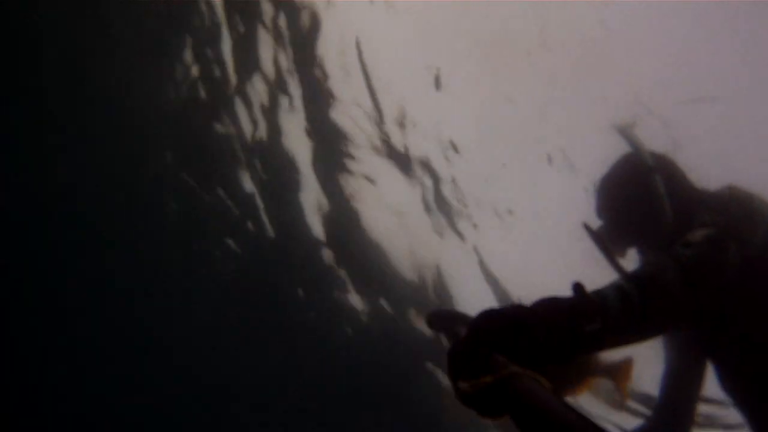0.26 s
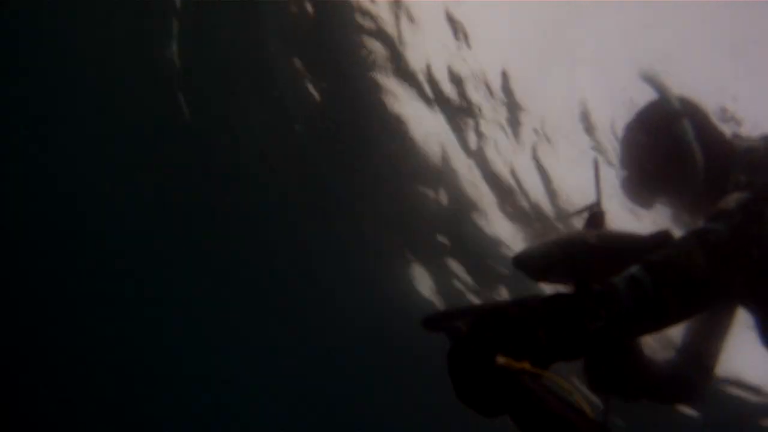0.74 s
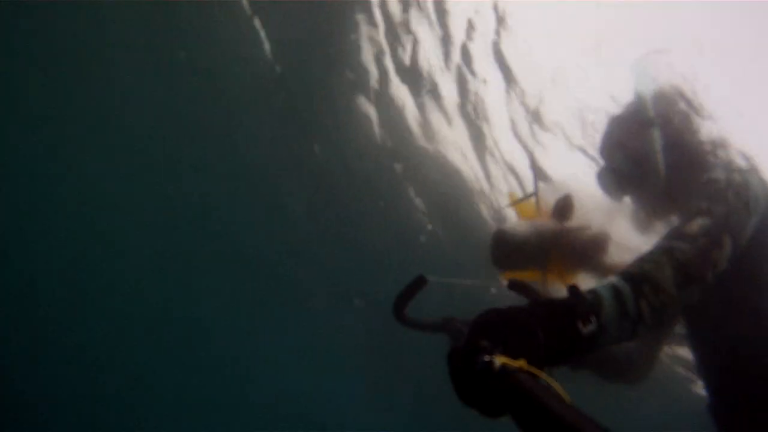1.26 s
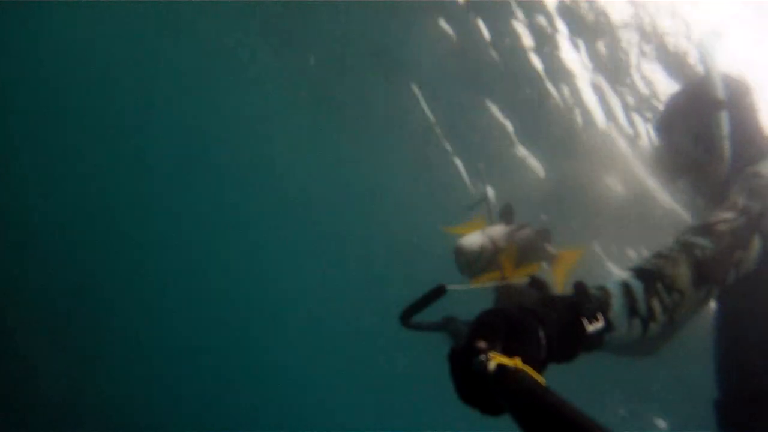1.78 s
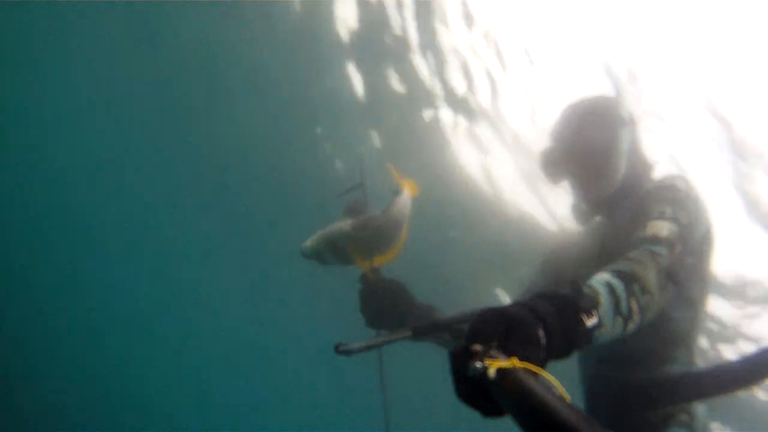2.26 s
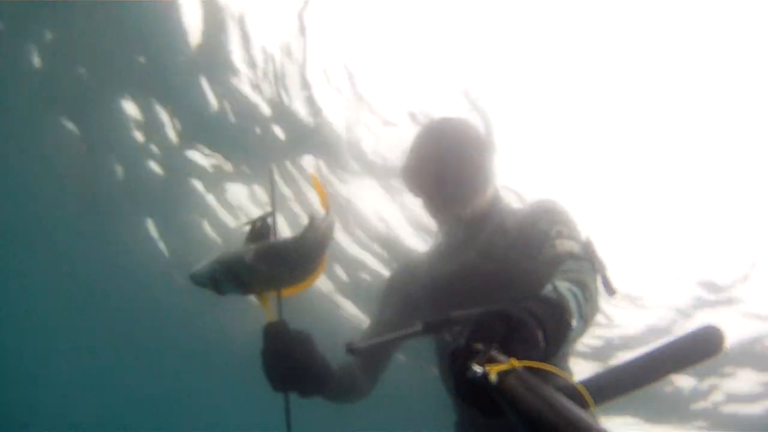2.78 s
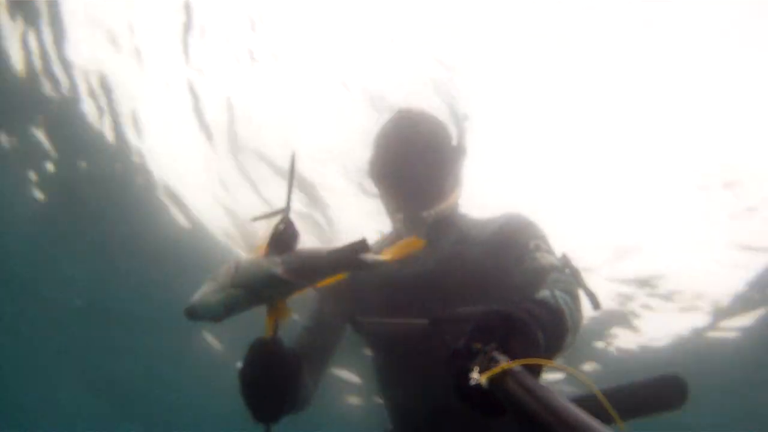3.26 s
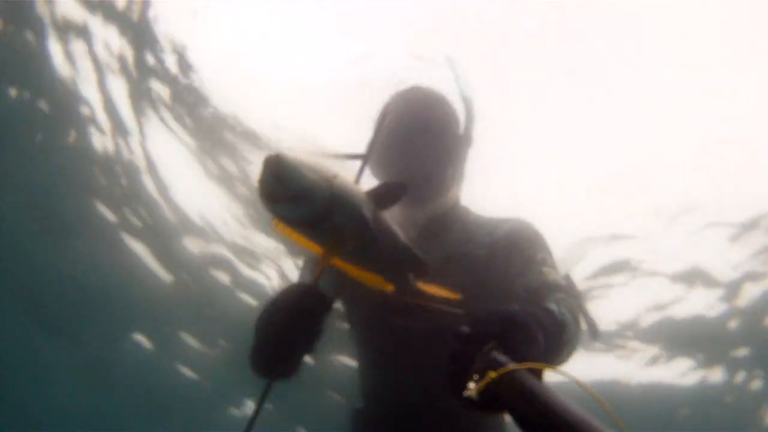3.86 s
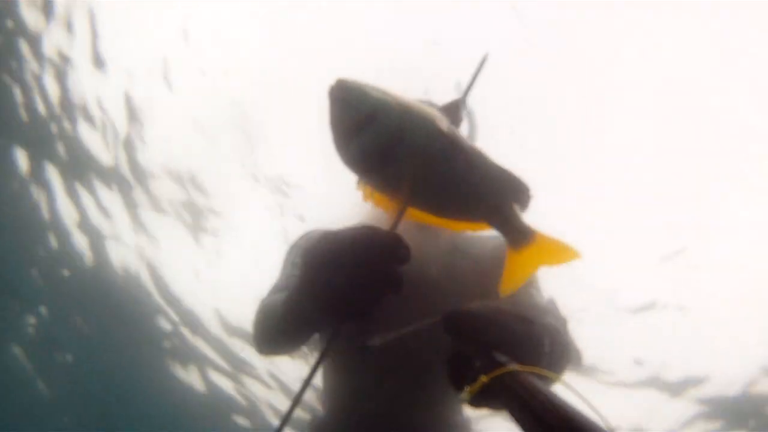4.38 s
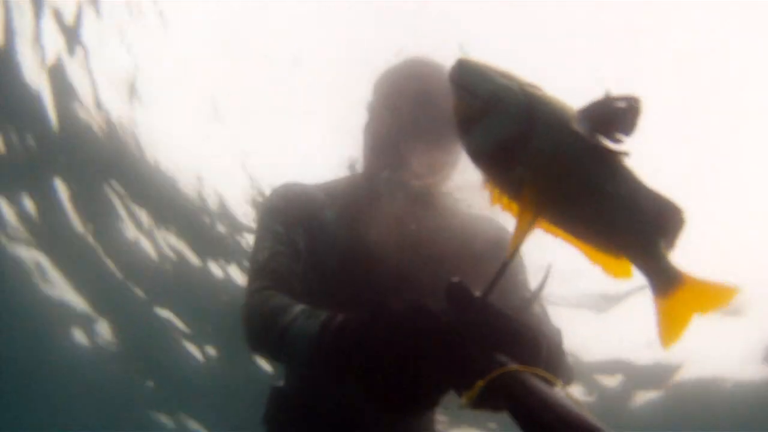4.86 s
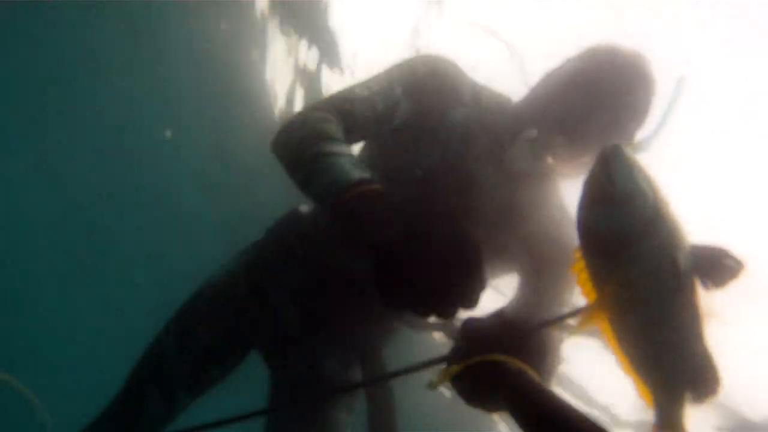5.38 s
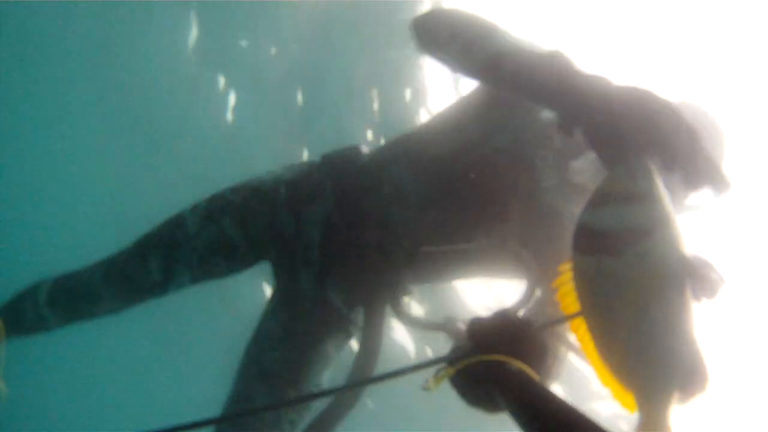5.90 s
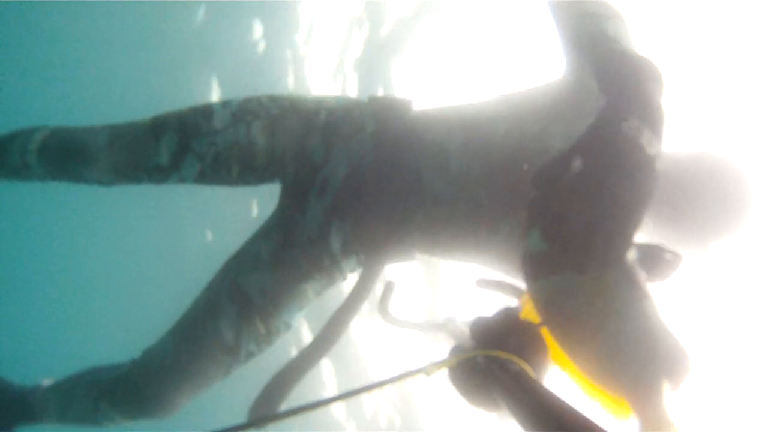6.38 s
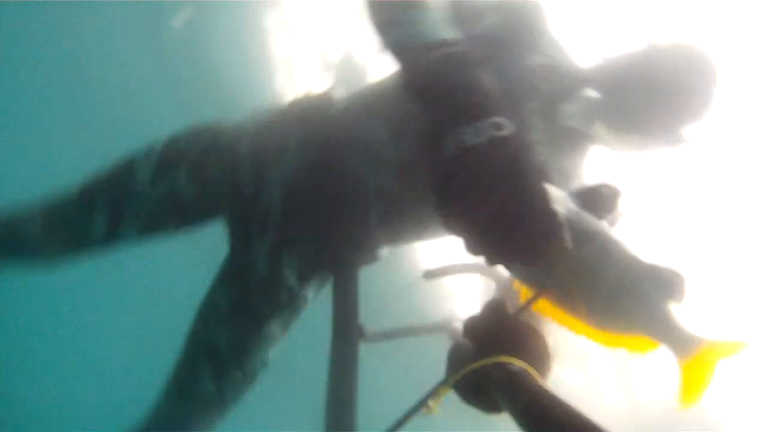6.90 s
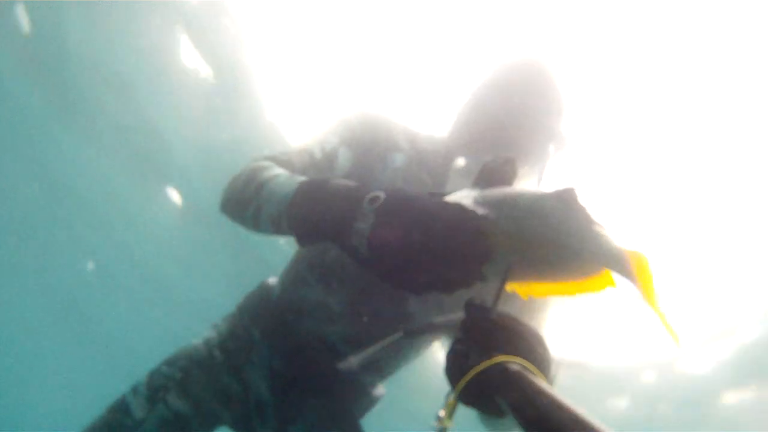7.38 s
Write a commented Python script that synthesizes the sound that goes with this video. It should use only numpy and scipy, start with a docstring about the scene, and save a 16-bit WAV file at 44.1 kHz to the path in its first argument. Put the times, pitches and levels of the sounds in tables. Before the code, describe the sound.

Snapping shrimp crackle under water while a diver handles a speared fish, the gun knocking and scraping as water rumbles close by.

```python
"""A speargun knocks, rubs and shakes under water as a diver handles a speared fish.
Jerks run down the shaft as chirps, most of them falling, and moving water rumbles and swishes.
All around, snapping shrimp crackle: each snap is a tiny bubble collapsing.
A camera on the gun hears it all. It holds each sample of a slow clock, which mirrors
the sound faintly into the treble."""
import sys
import numpy as np
from scipy import signal
from scipy.fft import rfft, irfft, next_fast_len
from scipy.io import wavfile
from scipy.ndimage import uniform_filter1d, map_coordinates

SR = 44100
rng = np.random.default_rng(int(sys.argv[2]) if len(sys.argv) > 2 else 0)


def wav_out(sig):
    """Save sig, one row per channel (or a flat mono array), as 16-bit PCM at SR to the path in sys.argv[1]."""
    wavfile.write(sys.argv[1], SR, np.round(np.clip(np.atleast_2d(sig).T, -1, 1) * 32767).astype(np.int16))


N = 336924
TIME = np.arange(N) / SR


def amp(db):
    """Turn decibels into a number to multiply by."""
    return 10 ** (np.asarray(db) / 20)


def unit(x):
    """Scale a signal to an average strength (rms) of 1."""
    return x / np.sqrt(np.mean(x ** 2) + 1e-20)


def filtered(x, response):
    """Turn each frequency in x up or down by response(hz)."""
    size = next_fast_len(len(x) + 8192)
    return irfft(rfft(x, size) * response(np.fft.rfftfreq(size, 1 / SR)), size)[:len(x)]


def noise(points):
    """Noise whose tone colour follows (frequency [Hz], level [dB]) points."""
    freqs, db = np.transpose(points)
    colour = lambda hz: amp(np.interp(np.log(hz + 1), np.log(freqs), db))
    return unit(filtered(rng.standard_normal(N), colour))


def click(response, size=1024):
    """A click of the given tone colour, packed as early as possible (minimum phase)."""
    cepstrum = irfft(np.log(response(np.fft.rfftfreq(size, 1 / SR)) + 1e-6))
    cepstrum[1:size // 2] *= 2
    cepstrum[size // 2 + 1:] = 0
    return irfft(np.exp(rfft(cepstrum)))


def envelope(s, rise, hold, t60):
    """Swell up to time s, hold, then fade. A t60 is the seconds taken to fade by 60 dB."""
    return np.clip(1 + (TIME - s) / rise, 0, 1) * amp(-60 * np.maximum(TIME - s - hold, 0) / t60)


def add(track, s, sound):
    """Mix a sound into the track at time s."""
    part = track[max(round(s * SR), 0):][:len(sound)]
    part += sound[:len(part)]


# pitches at which the camera case rings: (frequency [Hz], width [Hz], level [dB])
CASE_RESONANCES = [(567, 130, -5.5), (873, 140, -9), (1300, 565, -6.5), (1764, 336, -3.5), (2395, 337, 0.5),
                   (2670, 600, -3), (3263, 306, -3.5), (3826, 610, -5), (4142, 386, -3), (5035, 370, -7.5),
                   (5560, 980, -12)]

def camera_case(hz):
    """How strongly the case passes each frequency: most near its own broad resonances."""
    return np.sqrt(sum(amp(2 * db) / (1 + (2 * (hz - centre) / width) ** 2) ** 1.5
                       for centre, width, db in CASE_RESONANCES))


def snap(centre_hz, body_db, width_octaves=0.82, peak_db=7, echo_t60=0.011, tail_db=-20, tail_t60=0.052):
    """One bubble collapses: a spike, quick echoes in the case and a weak tail."""
    t = np.arange(SR // 30) / SR
    paths = rng.standard_normal(len(t)) * (amp(-60 * t / echo_t60) + amp(tail_db - 60 * t / tail_t60))
    paths[0] += 3  # the spike that arrives directly
    peak = lambda hz: peak_db * np.exp(-(np.log2((hz + 1) / centre_hz) / width_octaves) ** 2)
    body = lambda hz: body_db / (1 + (hz / (1.35 * centre_hz)) ** 6)
    wave = signal.fftconvolve(paths, click(lambda hz: camera_case(hz) * amp(peak(hz) + body(hz))))
    return wave / np.sqrt(np.sum(wave ** 2) / (0.004 * SR))  # as much energy as 4 ms at strength 1


def far_shrimp(snaps_per_s=270, faint_db=-56, spread_db=7, loudest_db=-39, haze_db=-56, directions=24):
    """The colony crackles: many faint snaps, fewer strong ones, over a hiss of the farthest."""
    out = amp(haze_db) * unit(filtered(rng.standard_normal(N), camera_case))
    for _ in range(directions):  # each direction has its own tone colour
        when, size, tint = rng.random((int(snaps_per_s * N / SR / directions), 3)).T
        db = faint_db - spread_db * np.log(1 - size * (1 - np.exp((faint_db - loudest_db) / spread_db)))
        spikes = np.bincount((when * N).astype(int), amp(db), N)
        centre_hz = 3000 * 2 ** (1.8 * (tint[0] - 0.5))
        out += signal.oaconvolve(spikes, snap(centre_hz, body_db=5))[:N]
    return out


# tone colours of water rumbling on the case and swishing by: (frequency [Hz], relative level [dB])
RUMBLE_COLOUR = [(12, -9), (26, 5.5), (45, 2.5), (60, -9), (85, -5), (110, -19.5), (170, -49), (400, -49)]
SWISH_COLOUR = [(50, -10), (100, 5.5), (170, 1), (250, -1.5), (340, -5), (450, -11), (900, -22),
                (2000, -72)]
# slow drift of water past the case: (time [s], relative level [dB])
WATER_DRIFT = [(0, -30), (.48, -32.5), (.72, -27.5), (1.08, -35.5), (1.33, -46.5), (2.48, -44.5),
               (2.8, -54.5), (3.17, -46), (3.52, -56), (3.64, -44), (4.5, -41.5), (4.77, -54), (4.92, -45),
               (5.6, -48), (5.96, -42), (6.4, -53.5), (6.55, -42.5), (7.16, -40.5), (7.36, -31.5)]

def water(calm_swish_db=-56):
    """Drift and the swirls behind each jolt rumble on the case; drift, strokes and jolts also swish."""
    drift = amp(np.interp(TIME, *np.transpose(WATER_DRIFT)))
    wakes = sum(amp(db) * envelope(s + 0.02, rise=0.02, hold=0, t60=0.67)
                for s, *_, db, _, _ in GUN_JOLTS)
    stirred = sum(amp(db) * envelope(s, rise, hold=0, t60=0.38) for s, *_, db, rise in GUN_JOLTS)
    swirls = noise(RUMBLE_COLOUR)
    swirl_level = np.sqrt(np.abs(uniform_filter1d(swirls ** 2, size=4000)) + 0.056)
    push = np.minimum(amp(-2) * np.hypot(drift, wakes), amp(-28))
    rumble = push * swirls / swirl_level  # evened out, so the push sets the slow swell
    swish_level = np.sqrt(amp(calm_swish_db) ** 2 + (amp(-22) * drift) ** 2
                          + (amp(-8) * sliding()) ** 2 + stirred ** 2)
    return rumble + swish_level * noise(SWISH_COLOUR)


# strokes of shaft and glove along the gun: (time [s], length [s], relative level [dB])
SLIDING_STROKES = [(.02, .04, -51.5), (0.624, 0.3, -54), (3.47, 0.11, -52), (3.984, 0.23, -51),
                   (5.142, 0.15, -48), (5.286, .035, -37), (5.362, 0.65, -54.5), (6.214, 0.052, -46),
                   (6.535, 0.037, -52), (6.781, 0.15, -44.5), (7.446, 0.1, -39)]

def sliding(grip_db=-59.5):
    """How hard things rub: each stroke swells, holds and fades over the resting hand's friction."""
    strokes = [amp(db) * envelope(s, rise=0.066, hold=length, t60=0.3)
               for s, length, db in SLIDING_STROKES]
    return np.sqrt(amp(grip_db) ** 2 + np.sum(np.square(strokes), axis=0))


# tone colours of gentle sliding and hard scraping: (frequency [Hz], relative level [dB])
SLIDE_COLOUR = [(200, -23), (400, -5), (540, 1.5), (720, -5.5), (820, -9.5), (970, -3.5), (1150, -42),
                (1500, -12.5), (2500, -41), (5000, -61)]
SCRAPE_COLOUR = [(600, -11), (950, -11), (1150, 1), (1300, -8), (1700, -2), (2050, 0), (2500, -15),
                 (4000, -51)]

def rubbing(grains_per_s=150, grain_db=2, light_db=-57, hard_db=-40, ring_width_hz=35):
    """Uneven friction makes the gun ring; a light touch fades out, a hard one also scrapes."""
    force = amp(-0.33) * sliding()
    contact = force / np.hypot(force, amp(light_db))
    ringing = lambda hz: 1 + sum(0.37 / (1 + (2 * (hz - centre) / ring_width_hz) ** 2)
                                 for centre, _, _ in GUN_RESONANCES)
    slide = contact * unit(filtered(noise(SLIDE_COLOUR), ringing))
    scrape = amp(-6) * force / np.hypot(force, amp(hard_db)) * noise(SCRAPE_COLOUR)
    grains = rng.standard_normal(int(N * grains_per_s / SR) + 4)
    roughness = map_coordinates(grains, [TIME * grains_per_s])  # a smooth curve through the grains
    return force * unit(amp(grain_db * roughness)) * (slide + scrape)


# jerks running down shaft and line:
# (time [s], relative level [dB], first pitch [Hz], last pitch [Hz], length [s])
SHAFT_CHIRPS = [(.008, -29.5, 2570, 2600, 0.027), (.033, -35, 3650, 3010, 0.017),
                (0.036, -30.5, 1960, 1146, 0.026), (0.057, -41.5, 800, 550, 0.022),
                (0.234, -37, 336, 222, 0.053), (0.28, -28, 204, 142, 0.077), (.817, -33, 1920, 850, .011),
                (.827, -23.5, 574, 450, .014), (0.837, -25.5, 236, 206, 0.032),
                (0.996, -43, 226, 179, 0.016), (2.294, -40, 258, 133, .037),
                (3.436, -42.5, 399.5, 276, .11), (4.126, -32, 846, 450, .019),
                (6.04, -45.5, 493, 470, 0.11), (7.218, -30.5, 191.6, 77, 0.044)]

def chirps(waver=0.093, rough=0.8):
    """A bend travels along the shaft, high notes fastest; taking several paths makes it sound rough."""
    out = np.zeros(N)
    for s, db, first_hz, last_hz, length in SHAFT_CHIRPS:
        progress = np.linspace(0, 1, int(length * SR))
        bend, flutter, smear = [np.interp(progress, np.linspace(0, 1, 12), points)
                                for points in rng.standard_normal((3, 12))]
        hz = first_hz * (last_hz / first_hz) ** progress * (1 + waver * bend)
        phase = 2 * np.pi * np.cumsum(hz) / SR
        tone = (1 + rough * flutter) * np.sin(phase) + rough * smear * np.cos(phase)
        swell = np.sqrt(np.abs(np.sin(np.pi * progress)))
        add(out, s, amp(db - 3) * unit(tone) * swell)
    return out


# snaps of the nearest shrimp: (time [s], relative level [dB], centre pitch [Hz])
NEAR_SNAPS = [(0.2257, -34.5, 2480), (0.316, -33.5, 3500), (0.3792, -33, 2440), (.436, -37, 2550),
              (.573, -34.5, 1740), (1.025, -27.5, 3670), (1.3122, -28, 2920), (1.7358, -34.5, 2830),
              (1.7504, -34, 2900), (1.7933, -36, 2760), (1.839, -39.5, 2480), (1.8793, -27, 2600),
              (2.011, -37.5, 2430), (2.3327, -29, 1960), (2.6587, -34.5, 2210), (2.724, -36, 2920),
              (2.7739, -32, 2850), (2.93, -38.5, 2440), (3.402, -27, 1860), (3.4428, -35, 2350),
              (3.521, -36, 2300), (3.681, -35.5, 2610), (3.7152, -36.5, 1670), (3.7481, -29, 2670),
              (3.8234, -36.5, 2800), (4.0386, -30.5, 1950), (4.2116, -35, 2950), (4.231, -25.5, 2100),
              (4.368, -36, 2580), (4.5266, -36, 2700), (4.7037, -36.5, 2030), (4.7916, -36.5, 2560),
              (4.8607, -34, 2950), (4.9344, -35.5, 2070), (4.9735, -37.5, 2130), (5.112, -26.5, 2560),
              (5.2637, -36, 1390), (5.2915, -29.5, 2320), (5.3144, -36, 1810), (5.4625, -24, 1900),
              (5.7782, -27, 2130), (5.8567, -36.5, 2650), (6.0753, -36, 2730), (6.1952, -25, 1830),
              (6.3498, -34.5, 2390), (6.4616, -35, 3240), (6.499, -37, 3170), (6.5192, -36.5, 2260),
              (6.5324, -35.5, 2150), (6.608, -37, 2400), (6.643, -33.5, 1960), (6.9364, -34.5, 2700),
              (7.0038, -29, 2660), (7.19, -34, 3380), (7.3274, -36.5, 1740)]

def near_shrimp(thin_db=-35, thin_hz=2500):
    """Loud single snaps, each with its own colour; the nearest and deepest sound fullest."""
    out = np.zeros(N)
    for s, db, hz in NEAR_SNAPS:
        body_db = 0.51 * (db - thin_db) + 14 * np.clip(np.log2(thin_hz / hz), -0.2, 0.35)
        add(out, s, amp(db + 2) * snap(hz, body_db))
    return out


# jolts of the whole gun, and the water they stir: (time [s], level [dB], pitch [Hz], fade time [s],
# relative wake level [dB], swish level [dB], swish rise time [s])
GUN_JOLTS = [(0.267, -19.5, 55, 0.16, -36, -39.5, 0.11), (0.838, -9, 48.3, 0.19, -19.5, -34.5, 0.024),
             (1.015, -19.5, 44.5, .4, -32.5, -51, 0.027), (2.325, -24, 45.6, 0.26, -31.5, -45, .05),
             (3.594, -29.5, 82, 0.37, -34, -48, 0.32), (4.14, -16, 32.8, 0.28, -30.5, -48.5, 0.056),
             (5.228, -19.5, 68.8, .27, -26.5, -60, .02), (7.245, -28.5, 86, 0.2, -30, -41.5, 0.075),
             (7.593, -25, 65, 0.23, -41, -44, .03)]

def jolts(attack_s=0.0029, octave_db=-12):
    """The gun swings with a low thud, plus a weaker sway twice as fast, until the water stills it."""
    out, t = np.zeros(N), np.arange(SR // 2) / SR
    for s, db, hz, t60, *_ in GUN_JOLTS:
        swing = np.sin(2 * np.pi * hz * t) + amp(octave_db) * np.sin(2 * np.pi * 2 * hz * t)
        add(out, s, amp(db - 60 * t / t60) * (1 - np.exp(-t / attack_s)) * swing)
    return out


# notes at which the gun and camera mount ring: (pitch [Hz], relative level [dB], free fade time [s])
GUN_RESONANCES = [(107.5, -6.5, 0.18), (197, -14.5, 0.42), (364, -3.5, 0.075), (562.3, 2.5, 0.13),
                  (600, -17.5, 0.74), (726, -7, 0.23), (857, 1.5, 0.053), (971, -0.5, 0.055),
                  (1055, 0.5, 0.0063), (1273, 1, 0.019), (1445, -4, 0.062), (1660, -11, 0.057),
                  (2140, -12.5, 0.079), (2620, -19, 0.071), (2720, -4.5, 0.038), (2920, -7, .04),
                  (3200, -1, 0.018), (4100, -9, 0.022)]
# blows on the gun:
# (time [s], relative level [dB], treble limit [Hz], share of free fade time [0-1], bass limit [Hz])
GUN_KNOCKS = [(.5735, -22.5, 850, 0.23, 450), (3.4798, -17, 1210, 0.085, 447), (3.5706, -9, 405, 0.11, 300),
              (3.6877, -13.5, 930, 0.086, 302), (3.6914, -14.5, 840, 0.12, 300),
              (3.7052, -16, 880, 0.16, 328), (3.7195, -23, 810, 0.24, 330), (4.5876, -32.5, 724, 0.12, 300),
              (4.9335, -28, 915, 0.2, 400), (5.2153, -7.5, 2160, 0.93, 320), (5.2228, -10, 760, 0.55, 340),
              (5.2301, -27, 620, 0.15, 300), (7.0855, -13.5, 1700, 0.094, 760),
              (7.213, -21.5, 458, 0.33, 200), (7.5774, -29, 600, .27, 300), (7.5858, -26.5, 600, 0.71, 300)]

def knocks(attack_s=0.00053, crack_db=-2, crack_t60=0.044, scatter_db=1.6):
    """Each blow rings the gun; a soft contact dulls the ring and the diver's grip shortens it."""
    out, t = np.zeros(N), np.arange(SR // 2) / SR
    hz, level, free_t60 = np.transpose(GUN_RESONANCES)[:, :, None]
    for s, db, treble_hz, share, bass_hz in GUN_KNOCKS:
        note_db = level + scatter_db * rng.standard_normal(hz.shape)
        t60 = free_t60 * share + 0.0039
        ring = np.sum(amp(note_db - 60 * t / t60) * np.sin(2 * np.pi * hz * t), axis=0)
        crack = amp(crack_db - 60 * t / crack_t60) * rng.standard_normal(len(t))
        blow = (ring + crack) * (1 - np.exp(-t / attack_s))
        dulled = signal.lfilter(*signal.butter(2, treble_hz, fs=SR), blow)
        bass_cut = signal.butter(2, bass_hz, "highpass", fs=SR)  # a light tap leaves low notes still
        add(out, s, amp(db - 3) * signal.lfilter(*bass_cut, dulled))
    return out


def scene():
    """Shrimp, handling and moving water all reach one microphone inside the case."""
    shrimp = near_shrimp() + far_shrimp()
    handling = knocks() + chirps() + jolts() + rubbing()
    return (shrimp + handling + water())[None]


def record(dry, clock_hz=12000, edge_hz=5750, top_hz=15500):
    """The camera samples slowly and holds each value, adding faint mirror copies around its clock rate."""
    band = filtered(dry[0], lambda hz: 1 / np.sqrt(1 + (hz / edge_hz) ** 24))
    slow_samples = signal.resample_poly(band, clock_hz, SR)
    held = np.repeat(slow_samples, 8)
    out = signal.resample_poly(held, SR, 8 * clock_hz)[:N]
    return filtered(out, lambda hz: hz < top_hz)[None]


dry = scene()
out = record(dry)
wav_out(out)
```